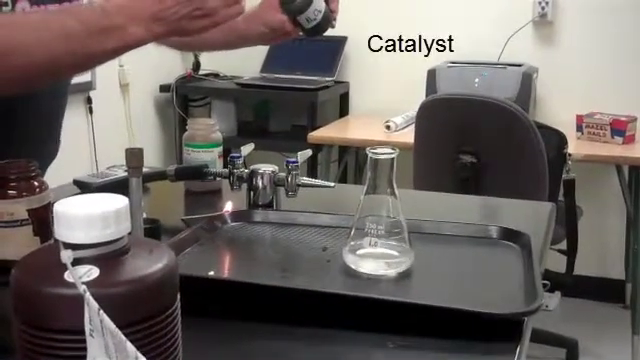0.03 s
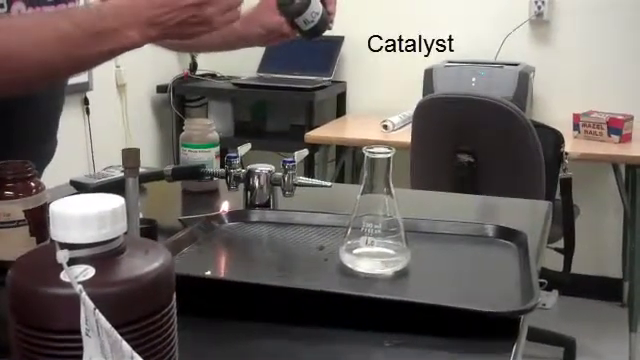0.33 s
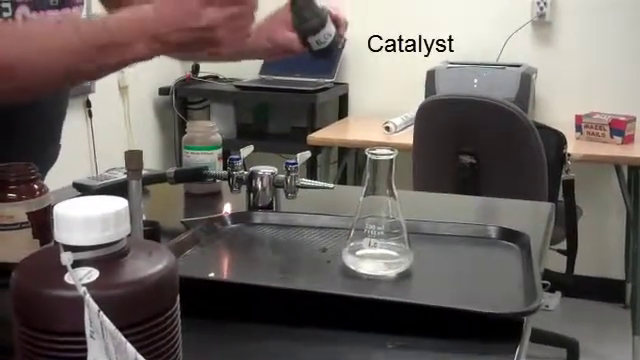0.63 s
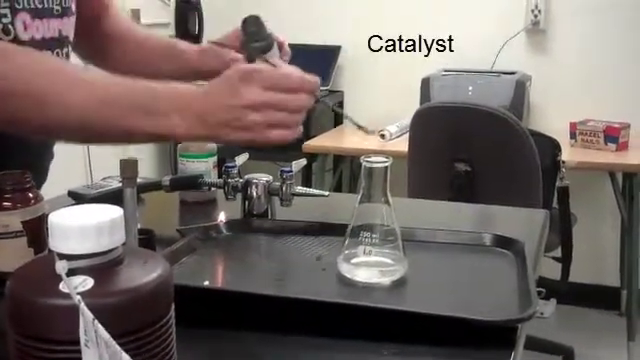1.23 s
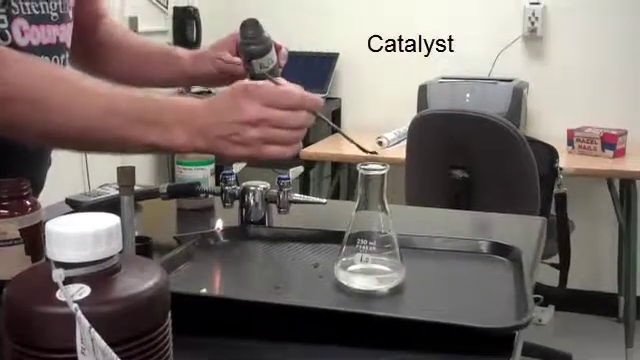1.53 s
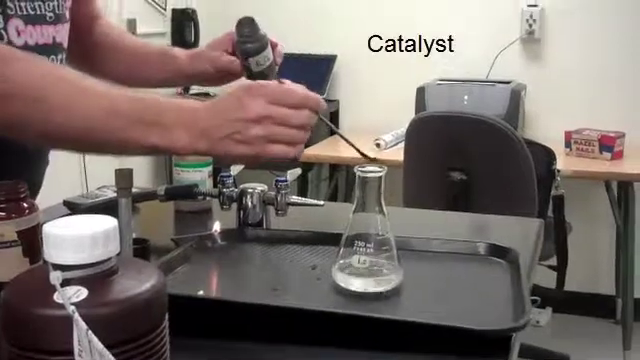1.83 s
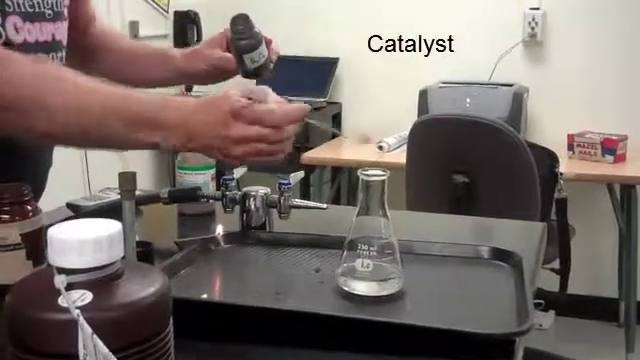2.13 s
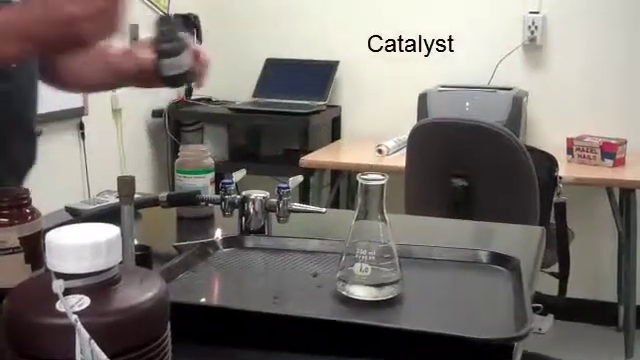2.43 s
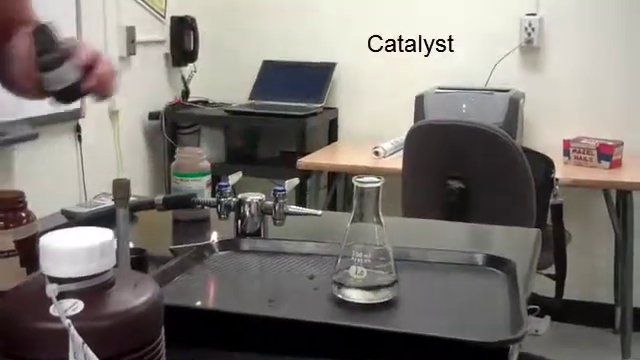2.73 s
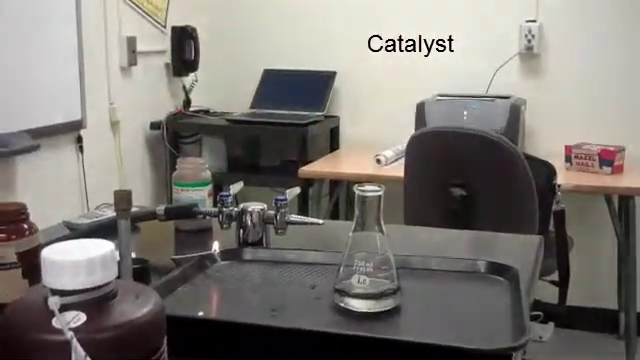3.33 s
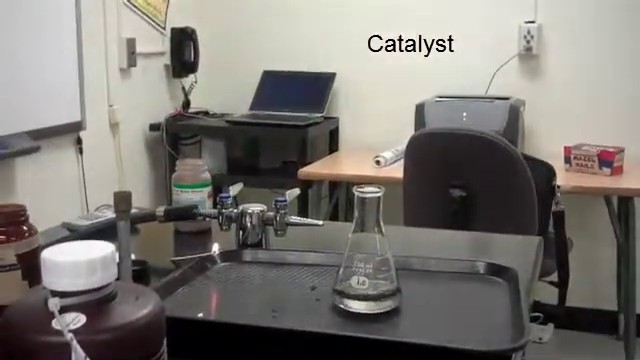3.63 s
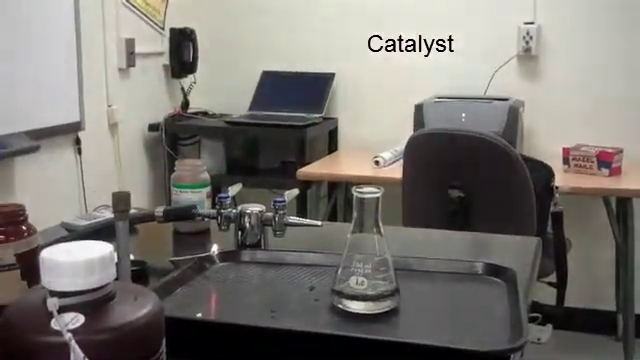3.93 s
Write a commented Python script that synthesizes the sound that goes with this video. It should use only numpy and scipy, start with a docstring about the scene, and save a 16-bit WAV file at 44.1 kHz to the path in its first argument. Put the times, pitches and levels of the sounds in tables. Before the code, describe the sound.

Liquid fizzes in a glass flask, starting faintly after a soft hiss of scooped powder and slowly growing. A bottle rattles and knocks, a metal spatula clinks and glassware clanks loudly. Ventilation hums in a small laboratory.

```python
"""Fizzing powder in a laboratory

Ventilation hums in a small room. Powder is scooped from a bottle with a soft hiss and a few ticks,
then tipped into a glass flask, where the liquid fizzes: tiny bursting bubbles ring the air inside.
Bottle and spatula are put away with taps, a rattle, a hollow knock, a clink and a loud glassy clank."""
import sys
import numpy as np
from scipy import signal
from scipy.fft import rfft, irfft
from scipy.io import wavfile
from scipy.ndimage import uniform_filter1d

SR = 44100
rng = np.random.default_rng(int(sys.argv[2]) if len(sys.argv) > 2 else 0)


def put_to_file(sound):
    """Save the sound as 16-bit audio at rate SR, in the file named by the first command-line argument."""
    columns = np.atleast_2d(sound).T  # one column per channel
    safe = np.clip(columns, -1, 1)
    whole_steps = np.round(safe * 32767)
    wavfile.write(sys.argv[1], SR, whole_steps.astype(np.int16))


N = 176400  # 4 seconds


def undb(db):
    """Turn decibels into a gain to multiply by."""
    return 10 ** (np.asarray(db) / 20)


def unit(x):
    """Scale a signal to an average (rms) size of 1."""
    return x / np.sqrt(np.mean(x ** 2))


def times():
    """Time of each sample in seconds."""
    return np.arange(N) / SR


def curve(points):
    """Gain over time, joining (time [s], level [dB]) points."""
    return undb(np.interp(times(), *np.array(points).T))


def fade(start, fade_s):
    """Start suddenly, then die away by 60 dB in the fade time."""
    age = times() - start
    return (age >= 0) * np.exp(-np.log(1000) * np.maximum(age, 0) / fade_s)


def wander(per_s):
    """A smooth random drift, about 1 in size."""
    hold = int(SR / per_s)
    steps = rng.standard_normal(N)[np.arange(N) // hold]
    return unit(uniform_filter1d(uniform_filter1d(steps, hold), hold))


def tone_gains(points):
    """Gain at every frequency, joining (frequency [Hz], level [dB]) points."""
    hz, db = np.array(points).T
    all_hz = np.arange(N // 2 + 1) * SR / N
    return undb(np.interp(np.log(all_hz + 1e-9), np.log(hz), db))


def colour(x, points):
    """Filter a sound to the tone given by (frequency [Hz], level [dB]) points."""
    cepstrum = irfft(np.log(tone_gains(points)), N)
    # fold it so the filter never rings before a sound arrives
    cepstrum[1:N // 2] *= 2
    cepstrum[N // 2:] = 0
    response = irfft(np.exp(rfft(cepstrum)), N)[:N // 10]
    return signal.fftconvolve(x, response[None], axes=1)[:, :x.shape[1]]


def resonate(x, hz, width_hz):
    """Keep a narrow band around one pitch by filtering twice."""
    b, a = signal.iirpeak(hz, hz / width_hz / np.sqrt(2), fs=SR)
    return signal.lfilter(b, a, signal.lfilter(b, a, x))


def spread(pair, widths):
    """Mix two unrelated signals into left and right: one is shared, the other is their difference."""
    width = tone_gains(widths)
    shared, difference = rfft(pair[0]), rfft(pair[1]) * width
    return irfft(np.array([shared + difference, shared - difference]) / np.sqrt(1 + width ** 2), N)


def pan(db):
    """Left and right gains that make the left louder by db."""
    return undb(np.array([[db], [-db]]) / 2)


# How wide nearby sounds are in stereo (frequency [Hz], difference over shared part [dB])
NEAR_WIDTH = [(100, -35), (700, -60), (1300, -34), (2000, -40), (3000, -17), (4200, 1), (5200, -5),
              (5900, 4), (6500, -16), (7600, -18), (8500, 0.5), (10500, 2.5)]

def noise(widths=NEAR_WIDTH):
    """An even hiss at both microphones."""
    return spread(rng.standard_normal((2, N)), widths)


def pops(per_s, unevenness_db):
    """A crowd of tiny clicks of uneven size."""
    hits = rng.random((2, N)) < per_s / SR
    sizes = undb(unevenness_db * np.minimum(rng.exponential(size=(2, N)), 2 * np.pi))
    return spread(hits * sizes * rng.choice([-1, 1], (2, N)), NEAR_WIDTH)


# How wide the room sounds in stereo (frequency [Hz], difference over shared part [dB])
ROOM_WIDTH = [(30, -15), (60, -17.5), (130, -20), (330, -20.5), (590, -15), (1050, -11), (1850, -5.5),
              (3280, -1), (5810, 1), (10300, 1)]
# Tone of the fans' rush and of the thin air hiss (frequency [Hz], level [dB])
RUSH_TONE = [(15, -80), (25, -26), (59, -8), (75, -7), (86, -12.5), (103, -8), (124, -5), (172, -3),
             (201, -6.5), (224, -5), (265, -5.5), (305, -11.5), (384, -16.5), (690, -20), (1000, -24),
             (1300, -34), (2200, -120)]
AIR_TONE = [(900, -40), (1100, 3.5), (1700, 2.5), (2100, -1), (3000, -5), (4000, -10.5), (6000, -12),
            (7500, -11.5), (9000, -17.5), (10800, -20.5)]
# Notes in the fans' hum (pitch [Hz], level [dB])
HUM_NOTES = [(120, -46.5), (162, -48.5), (233, -55.5), (272, -51)]

def ventilation():
    """Fans make a low rush with a wavering hum, a thin hiss of air and a faint whine."""
    rush = undb(-39) * unit(colour(noise(ROOM_WIDTH), RUSH_TONE))
    hum = sum(undb(db) * np.sqrt(2) * np.sin(2 * np.pi * hz * times() + 1.32 * wander(per_s=6))
              for hz, db in HUM_NOTES)
    air = undb(-54) * unit(colour(noise(ROOM_WIDTH), [(500, -47)] + AIR_TONE))
    whine = undb(-75.5) * unit(resonate(noise(ROOM_WIDTH), hz=7780, width_hz=150))
    return rush + hum + air + whine


# Strokes through the powder (start [s], length [s], level [dB])
SCOOP_STROKES = [(-.1, 0.56, -51.5), (0.72, 0.2, -54.5)]
# Tone of the sliding grains (frequency [Hz], level [dB])
GRAIN_TONE = [(1000, 1.5), (2000, -5), (4000, -8.5), (5000, -5), (6500, -2.5), (7600, -3), (8500, -7.5),
              (10500, -14.5)]

def scooping():
    """Fine grains slide with each stroke and trickle out after it."""
    rise_s, trickle_s = 0.034, 0.14
    flow = 0
    for start, length, db in SCOOP_STROKES:
        age = times() - start
        rise = np.clip(age / rise_s, 0, 1)
        trickle = np.exp(-np.maximum(age - length, 0) / trickle_s)
        flow += undb(db) * rise * trickle
    return flow * unit(colour(pops(per_s=9000, unevenness_db=2.5), GRAIN_TONE))


# Light taps, and last a soft, short wash of room echo after the clink
# (time [s], relative level [dB], middle pitch [Hz], width [octaves], fade time [s])
TAPS_AND_WASH = [(0.694, -46, 7000, 0.72, .012), (.7622, -56, 6540, 0.24, 0.011),
                 (1.1, -50, 4200, 0.6, 0.008), (3.1436, -43, 3140, 1.4, 0.022),
                 (3.1973, -48.5, 2570, 0.8, 0.033), (3.1977, -40, 414, 0.47, 0.062),
                 (3.3066, -48, 504, 0.46, 0.04), (3.4203, -43, 550, 0.28, 0.038),
                 (3.4478, -38.5, 7350, 0.48, 0.016), (3.4485, -47, 2860, 0.2, 0.037),
                 (3.815, -43.5, 1650, 1.6, 0.12)]

def taps_and_wash():
    """Quick bursts of noise make the taps; a longer last one is the room's echo after the clink."""
    out, hz = 0, np.geomspace(100, 16000, 30)
    for start, db, middle_hz, octaves, fade_s in TAPS_AND_WASH:
        band_db = -10 * np.log10(1 + (np.log2(hz / middle_hz) / octaves) ** 4)
        band = unit(colour(noise(), np.c_[hz, band_db]))
        out += undb(db + 6) * band * fade(start, fade_s)
    return out


# Touches on the rim (time [s], level [dB], pitch [Hz], fade time [s])
RIM_PINGS = [(0.694, -45, 6000, 0.019), (0.7617, -47, 5870, 0.027), (1.101, -43, 5640, 0.0091),
             (1.1013, -39.5, 3290, 0.012), (1.1013, -43, 2600, 0.0073)]

def rim_pings():
    """The spatula touches the rim and rings for an instant."""
    return sum(undb(db) * np.sin(2 * np.pi * hz * (times() - start)) * fade(start, fade_s)
               for start, db, hz, fade_s in RIM_PINGS)


# Strength of the reaction (time [s], level [dB])
FIZZ_STRENGTH = [(1.55, -78), (1.7, -65.5), (2.1, -62.5), (2.4, -55.5), (2.7, -52.5), (3.1, -51.5),
                 (3.5, -50), (4.0, -49)]
# Notes of the air in the flask (pitch [Hz], width [Hz], relative level [dB])
FLASK_NOTES = [(3450, 310, -9), (4830, 200, -2.5), (5176, 66, 3), (6410, 510, 0), (7370, 590, 1),
               (7770, 320, 2.5), (8720, 360, -5), (9500, 320, -5), (10530, 380, 1.5)]
# Tone of the open spray (frequency [Hz], level [dB])
SPRAY_TONE = [(2500, 6), (4300, 7), (4800, -1), (5700, 1), (7500, 0), (9000, -4), (11000, 1.5)]
# Sizzle as the powder meets the liquid (time [s], level [dB]), and its pitch
SIZZLE, SIZZLE_HZ = [(1.55, -89), (1.63, -67), (2.1, -73), (2.7, -78), (3.2, -83)], 6320

def fizz():
    """Bursting bubbles ring the air in the flask, louder as the reaction takes hold."""
    bubbles_per_s, unevenness_db = 6000, 2
    bursts = pops(bubbles_per_s, unevenness_db)
    ring = 0
    for hz, width_hz, db in FLASK_NOTES:
        flicker_db = 1.6 * wander(per_s=24.83)  # each note flickers by itself
        ring += undb(db + flicker_db) * resonate(pops(bubbles_per_s, unevenness_db), hz, width_hz)
    spray = undb(-3.5) * unit(colour(bursts, SPRAY_TONE))
    foam = (unit(ring) + spray) * curve(FIZZ_STRENGTH)
    sizzle = unit(resonate(bursts, SIZZLE_HZ, width_hz=280)) * curve(SIZZLE)
    return (foam + sizzle) * undb(0.5 * wander(per_s=22))


def strike(hits, notes, crack_tone, ring_db, crack_db, crack_fade_s, crack_left_db):
    """Each hit makes a crack of noise and rings the object's notes, each in its own direction."""
    right_delay_s = 0.00004  # the ringing reaches the right microphone later
    age = np.maximum(times()[:N // 10] - np.array([[0], [right_delay_s]]), 0)
    ring = 0
    for hz, db, fade_s, left_db in notes:
        decay = np.exp(-np.log(1000) * age / fade_s)
        ring += undb(db + ring_db) * pan(left_db) * np.sin(2 * np.pi * hz * age) * decay
    crack = unit(colour(noise(), crack_tone)) * pan(crack_left_db)
    out = np.zeros((2, N))
    for start, db in hits:
        first = min(int(start * SR), N - 1)
        part = ring[:, :N - first]
        out[:, first:first + part.shape[1]] += undb(db) * part
        out += undb(db + crack_db) * crack * fade(start, crack_fade_s)
    return out


# Hits of the rattling bottle (time [s], relative level [dB])
RATTLE_HITS = [(3.2797, -34), (3.2853, -60), (3.2936, -48.5), (3.3, -47), (3.3065, -40.5)]
# Its notes (pitch [Hz], relative level [dB], fade time [s], left over right [dB])
RATTLE_NOTES = [(500, -6, .03, 0), (720, 10, .055, 0), (1809, -12, .05, 0), (2150, -6, .04, 0),
                (2417, -5, .025, 0), (2940, -7, .035, 0)]
# Tone of each hit's crack (frequency [Hz], level [dB])
RATTLE_TONE = [(200, -12), (700, 4), (1350, -9), (2100, 2), (3000, -1.5), (3800, -7), (4350, -18),
               (4900, -8), (7500, -5), (10500, -25)]

def bottle_rattle():
    """The bottle rattles in five quick hits."""
    return strike(RATTLE_HITS, RATTLE_NOTES, RATTLE_TONE,
                  ring_db=-0.5, crack_db=-1.5, crack_fade_s=0.075, crack_left_db=0.5)


# The bottle landing (time [s], relative level [dB])
KNOCK_HITS = [(3.6432, -31)]
# Its hollow notes (pitch [Hz], relative level [dB], fade time [s], left over right [dB])
KNOCK_NOTES = [(485, -5.5, 0.054, 0), (576, 3, 0.079, 0), (645, 10, 0.078, 0)]
# Tone of the landing's crack (frequency [Hz], level [dB])
KNOCK_TONE = [(200, -10), (600, -3), (1000, 2), (1700, 2), (3500, -1), (5500, -2), (8000, -15), (10500, -7)]

def bottle_knock():
    """The bottle is set down, and three short low notes make a hollow knock."""
    return strike(KNOCK_HITS, KNOCK_NOTES, KNOCK_TONE,
                  ring_db=2.0, crack_db=3.5, crack_fade_s=0.018, crack_left_db=2.0)


# The spatula landing (time [s], relative level [dB])
CLINK_HITS = [(3.7585, -32)]
# Notes of the steel (pitch [Hz], relative level [dB], fade time [s], left over right [dB])
CLINK_NOTES = [(2150, -9, .04, 0), (2455, -17, .14, 0), (2840, -5, .08, 4), (3402, -2.5, .11, -1),
               (4113, -15, .14, 2), (4490, 1.5, .12, 3), (5800, -9, .04, -7), (7273, 1, .105, 12),
               (8285, -7, .14, 4), (8899, -7, .09, 7), (10200, -4, .07, 9)]
# Tone of the landing's crack (frequency [Hz], level [dB])
CLINK_TONE = [(400, 0.5), (1100, 5.5), (1700, -1), (2300, -2.5), (3000, 12), (3900, -4), (4600, 3),
              (5300, -2), (6300, -5), (8000, 1), (10500, -16)]

def spatula_clink():
    """The steel spatula is put down and rings with many high notes."""
    return strike(CLINK_HITS, CLINK_NOTES, CLINK_TONE,
                  ring_db=0.5, crack_db=7.5, crack_fade_s=0.034, crack_left_db=0.5)


# Hits on the glassware (time [s], relative level [dB])
CLANK_HITS = [(3.9818, -17.5), (3.9845, -24), (3.9935, -33)]
# Notes of the glass (pitch [Hz], relative level [dB], fade time [s], left over right [dB])
CLANK_NOTES = [(1268, 3, 0.051, -1.5), (2490, -11, .12, 5), (3438, -8.5, 0.3, 0), (5090, -14, .08, -3),
               (5800, -14, 0.14, -5), (6440, -17, .07, -5), (7470, -11, 0.054, 4), (8266, -1, 0.076, 12),
               (9430, -8, .12, 12), (10094, -0.5, 0.049, 14)]
# Tone of each hit's crack (frequency [Hz], level [dB])
CLANK_TONE = [(300, -25), (900, -10.5), (1300, -0.5), (2000, -9), (3400, -4.5), (4600, -12), (5600, -6),
              (6800, -11.5), (8000, -6), (10500, 1.5)]

def glass_clank():
    """Three hits on glassware come so close together that they make one loud clank."""
    return strike(CLANK_HITS, CLANK_NOTES, CLANK_TONE,
                  ring_db=4.0, crack_db=9.5, crack_fade_s=0.07, crack_left_db=2.5)


def room(x):
    """The room adds a short wash of reflections and one soft echo from the far wall."""
    def tail(delay_s, fade_s):
        return unit(noise(ROOM_WIDTH) * fade(delay_s, fade_s)) / np.sqrt(N)
    wash = undb(-6) * tail(delay_s=0.0092, fade_s=0.16)
    echo = undb(-17.5) * tail(delay_s=0.055, fade_s=0.17)
    return x + signal.fftconvolve(x, wash + echo, axes=1)[:, :N]


def scene():
    """Add up fans, powder and fizz, plus the handling noises that echo in the room."""
    putting_away = bottle_rattle() + bottle_knock() + spatula_clink() + glass_clank()
    return ventilation() + scooping() + fizz() + room(taps_and_wash() + rim_pings() + putting_away)


# Tone of each microphone (frequency [Hz], level [dB])
LEFT_MIC_TONE = [(100, -12.5), (3000, -2.5), (4500, -0.5), (5700, 1), (6600, 2), (7400, 4), (8300, 3),
                 (9600, -2), (10800, -12)]
RIGHT_MIC_TONE = [(100, -12.5), (3000, -2), (4500, 1), (5700, 6), (6600, 3.5), (7400, -5.5), (8300, -7),
                  (9600, -5.5), (10800, -17.5)]

def record(dry):
    """Each microphone colours the sound; loud peaks are rounded and the highest treble is cut."""
    ceiling, top_hz = 2.5, 10900
    heard = np.vstack([colour(dry[:1], LEFT_MIC_TONE), colour(dry[1:], RIGHT_MIC_TONE)])
    rounded = ceiling * np.tanh(heard / ceiling)
    treble_cut = signal.ellip(10, 0.2, 85, top_hz, fs=SR, output="sos")
    return signal.sosfilt(treble_cut, rounded)


dry = scene()
out = record(dry)
put_to_file(out)
```